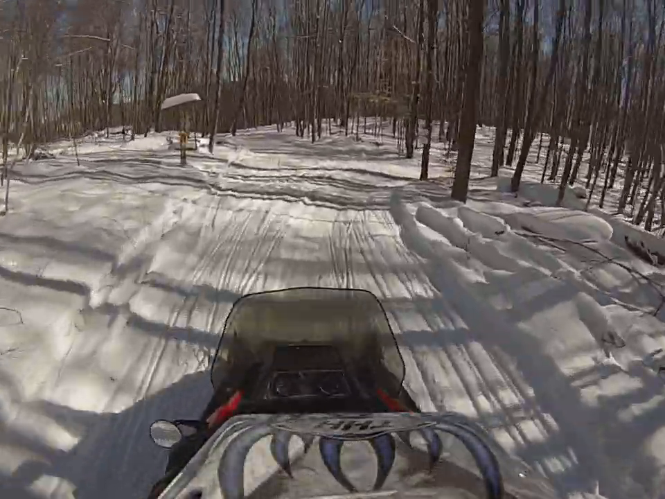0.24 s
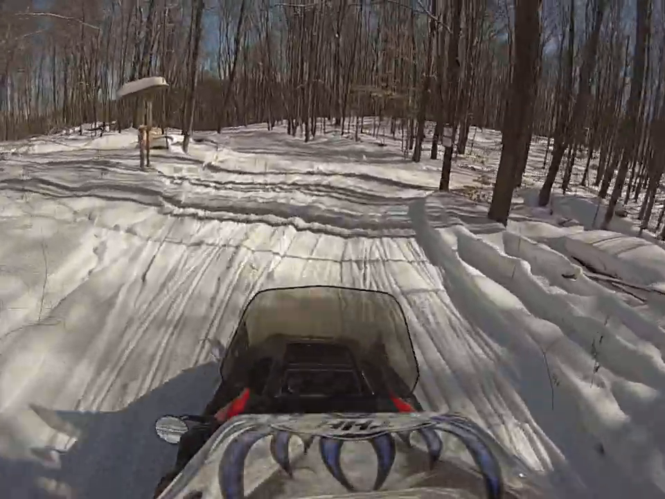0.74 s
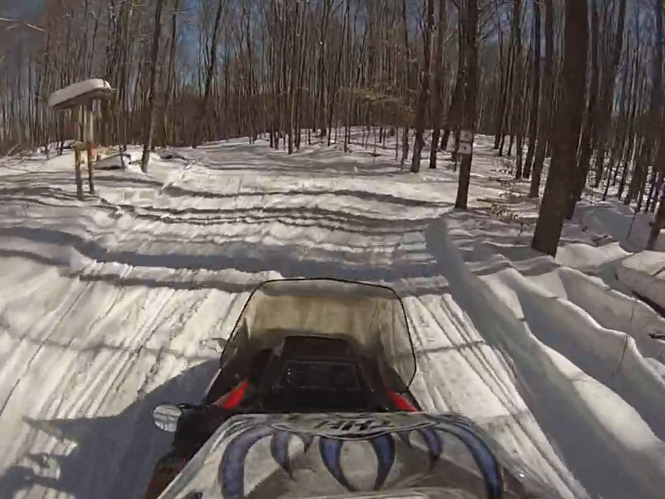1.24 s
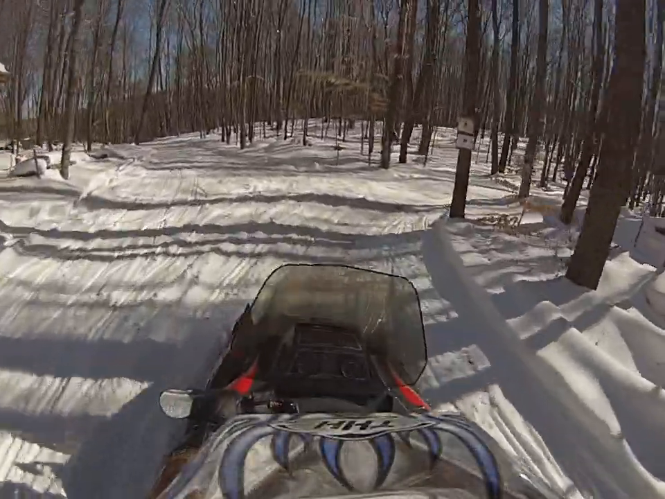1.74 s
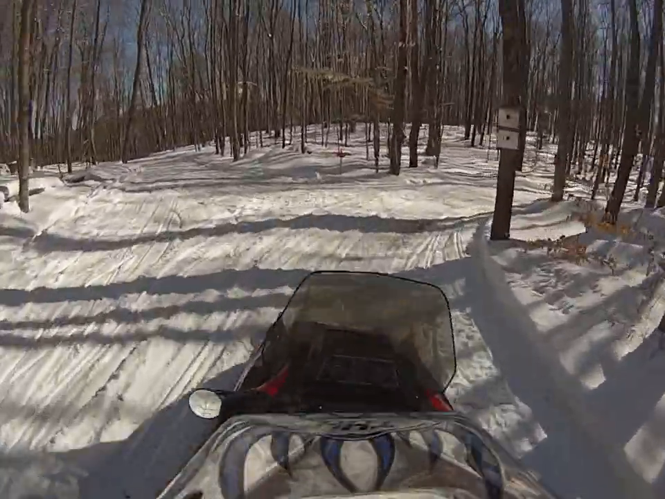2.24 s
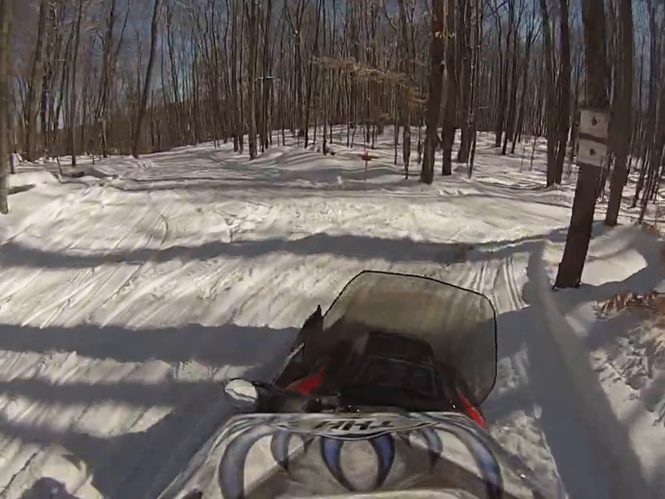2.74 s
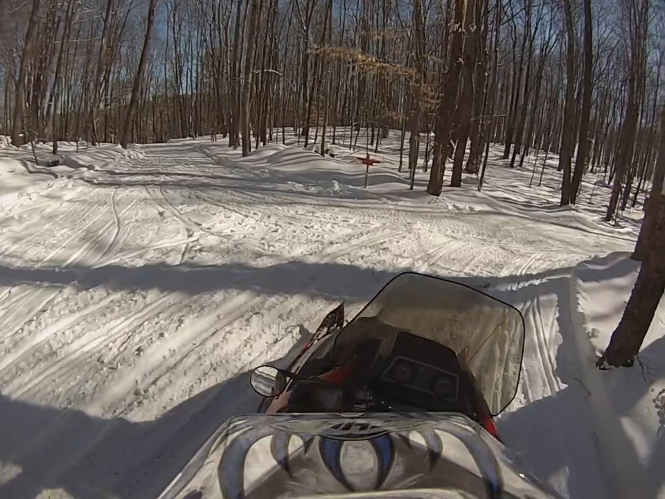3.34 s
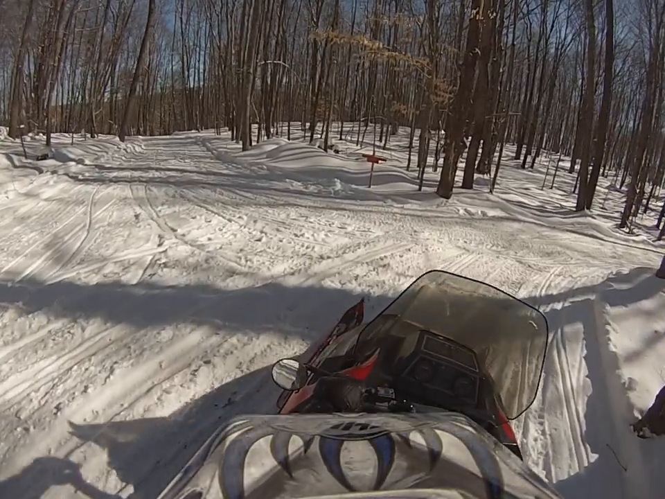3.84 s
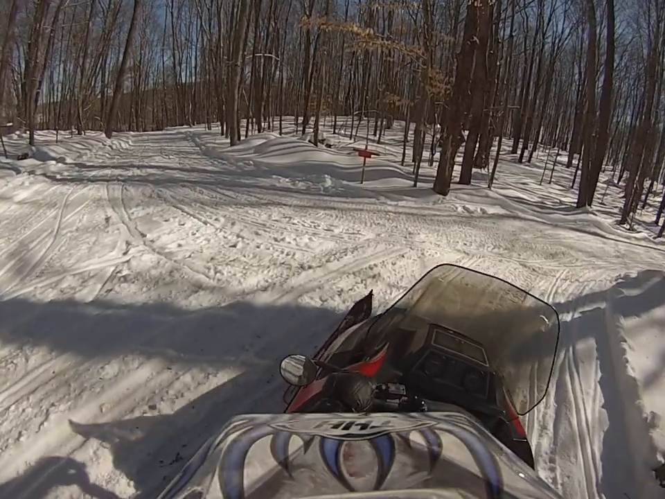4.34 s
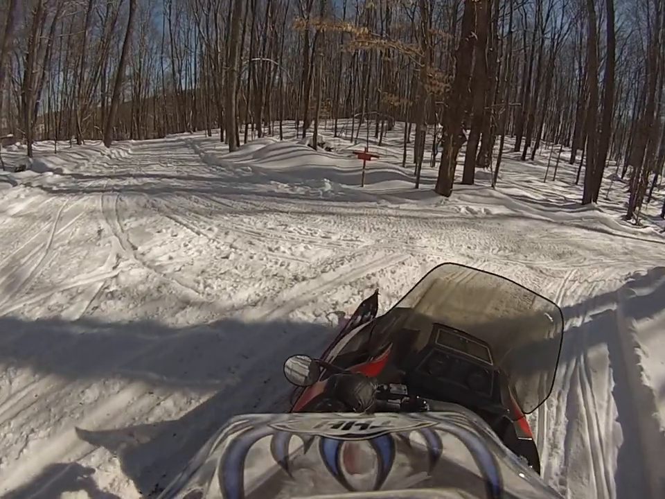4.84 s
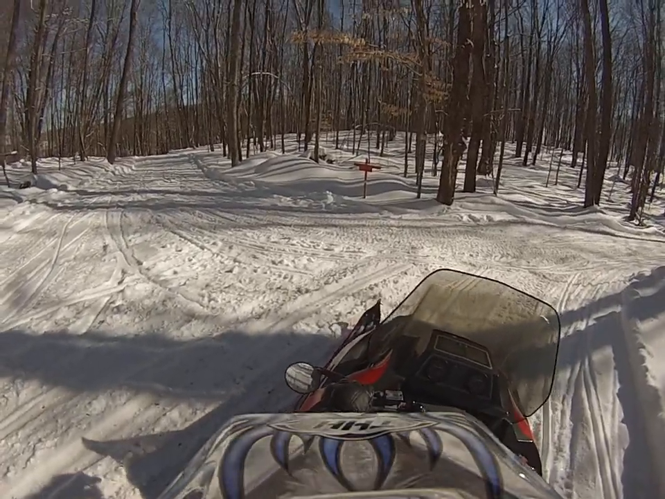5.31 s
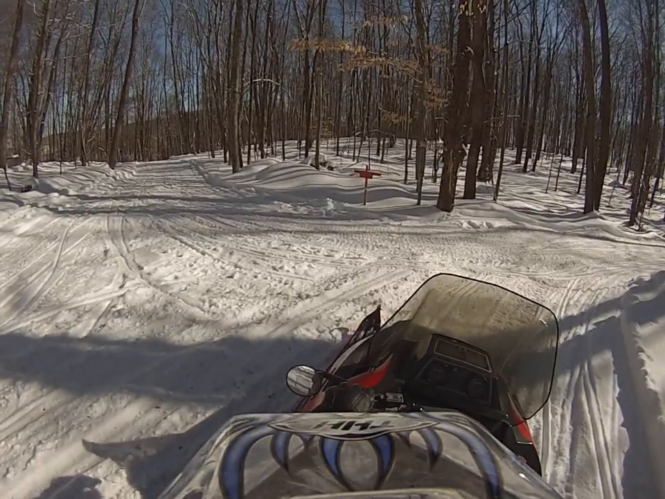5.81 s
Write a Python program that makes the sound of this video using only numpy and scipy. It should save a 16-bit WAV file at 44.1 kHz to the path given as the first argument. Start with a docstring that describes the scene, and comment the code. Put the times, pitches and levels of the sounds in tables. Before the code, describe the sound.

Close, dry onboard sound of a twin-cylinder snowmobile slowing on a snowy trail. Fast engine clatter and low rumble ease downward with the sinking hum of the track; a brief stronger drone comes as the track drags the engine. Slack belt knocks follow, then stop. The motor idles slower and slower, popping unevenly, each muffled chug shaking loose panels under a faint high mechanical hiss.

```python
"""A snowy trail, heard from the rider's helmet: a two-stroke twin snowmobile coasts to a stop.
The exhaust sums crank harmonics on the overrun and ringing bursts for the chugs, loping at idle.
Random blows and engine strokes ring the resonances of casing, clutch and panels.
The track hum is a sine that falls as the sled slows; filtered noise gives rumble, filtered blows
give snow crunch and hiss. Snow swallows all outdoor echo."""
import sys
import numpy as np
from scipy import signal
from scipy.fft import rfft, irfft
from scipy.io import wavfile

SR = 44100
rng = np.random.default_rng(int(sys.argv[2]) if len(sys.argv) > 2 else 0)


def pcm_store(signal):
    """Save signal as 16-bit PCM."""
    levels = np.round(np.clip(np.atleast_2d(signal), -1, 1) * 32767)
    wavfile.write(sys.argv[1], SR, levels.astype(np.int16).T)


N = 267687
T, HZ = np.arange(N) / SR, np.fft.rfftfreq(N, 1 / SR)

# Engine speed, two firings per crank turn. Each row: time in seconds, firing rate in Hz.
FIRING_HZ = [(0, 115), (.5, 113.3), (1.3, 101), (1.9, 98.6), (2.3, 90), (2.6, 89), (3.3, 80), (4.8, 64.3),
             (6.07, 59)]
# Overrun note: the track drives the engine. Each row: time in seconds, level in dB.
NOTE_DB = [(0, -49.5), (1.38, -48), (1.5, -37), (1.85, -33), (2.35, -42), (3.03, -45.5), (3.15, -52),
           (6.07, -61.5)]
# Second harmonic sinking into the muffler resonance. Each row: time in seconds, dB re fundamental.
SECOND_HARMONIC_DB = [(2.8, -29), (4, -8), (5, 1.5), (6, 10)]
# Bouts of hard firing. Each row: middle in seconds, exhaust level in dB before trim,
# length in seconds, panel shake in dB before trim.
CHUGS = [(.045, -36, 0.015, -50), (0.192, -36, 0.012, -58), (0.27, -37.5, .022, -46),
         (0.342, -41, .025, -60), (0.423, -42, 0.024, -54), (.52, -39, .015, -62),
         (0.599, -32.5, 0.038, -56), (0.713, -32, 0.028, -62), (.81, -33, .033, -66),
         (0.87, -36, .028, -60), (.926, -35, .025, -52), (0.99, -32, 0.032, -60), (1.105, -29, 0.03, -57),
         (1.179, -33.5, 0.026, -51), (1.251, -33, 0.064, -62), (1.327, -32, 0.04, -52),
         (1.413, -31, 0.057, -51), (1.86, -44, 0.028, -48), (1.97, -35, .025, -44),
         (3.129, -35, 0.015, -66), (3.192, -36, 0.026, -50), (3.267, -38, 0.025, -62),
         (3.375, -38, 0.036, -49), (3.437, -39, 0.036, -46.5), (3.504, -36, 0.058, -51),
         (3.657, -38, 0.097, -53), (3.758, -39, 0.041, -48), (3.871, -36, .05, -49),
         (3.999, -33.5, 0.034, -45.5), (4.109, -34.5, 0.048, -49.5), (4.21, -34, .036, -47),
         (4.323, -32.5, 0.035, -48.5), (4.46, -33, 0.038, -47), (4.583, -34.5, 0.044, -46),
         (4.723, -32.5, 0.065, -46), (4.801, -32.5, 0.047, -62), (4.867, -32.5, .021, -53),
         (4.968, -42, 0.013, -62), (5.101, -35.5, .028, -54.5), (5.208, -36, 0.028, -64),
         (5.32, -36, 0.067, -56), (5.42, -34, 0.034, -53), (5.475, -34, 0.036, -52),
         (5.556, -34.5, 0.038, -53), (5.637, -33.5, 0.028, -58), (5.732, -35, 0.024, -68),
         (5.786, -35.5, 0.032, -62), (5.837, -37, .035, -68), (5.915, -35, 0.068, -64),
         (6.023, -35, .032, -54)]
# Muffler ring, sinking with engine speed and lifting at idle. Each row: time in seconds, ring in Hz.
MUFFLER_HZ = [(.3, 104), (1.4, 103), (4.35, 95.4), (5.3, 97.56), (5.8, 102.5)]
# Track lugs over the drive wheel. Each row: time in seconds, lug rate in Hz, level in dB.
TRACK_LUGS = [(0, 300, -52), (.72, 274, -55), (1.38, 228, -69), (1.85, 196, -54.5), (2.3, 170, -61.5),
              (2.9, 128, -54), (3.4, 90, -54), (6.07, 30, -100)]
# Rocking with the crank. Each row: time in seconds, level in dB.
ROCKING_DB = [(3, -65), (4.75, -57), (5.2, -63)]

# Resonances. Each row: centre in Hz, width in Hz, relative level in dB.
CASING_MODES = [(1002, 67, -22), (1354, 39, -16), (1519, 69, -16), (1628, 74, -15), (1807, 56, -13),
                (1875, 41, -11), (1981, 105, -3.5), (2163, 77, -4.5), (2348, 126, 0.5), (2459, 131, 0),
                (2555, 65, -4), (2695, 31, -5.5), (2993, 110, -15), (3196, 97, -11.5), (3490, 130, -7),
                (3690, 150, -13), (3814, 120, -13), (3950, 120, -25), (4255, 140, -12), (4415, 290, -13.5),
                (4930, 440, -21), (5430, 230, -20), (5833, 97, -19.5), (7300, 150, -29.5)]
CLUTCH_MODES = [(2410, 500, 4), (3480, 250, 5.5), (4350, 235, 1.5), (4926, 230, 0.5), (6000, 250, -13),
                (6446, 310, 0), (6960, 290, -8.5), (7290, 320, -8.5)]
SHEAVE_MODES = [(1940, 126, 3.5), (2420, 320, -9), (3515, 180, 3.5), (4150, 420, 2.5), (4900, 230, -1.5),
                (6395, 200, -3.5)]
BLOCK_MODES = [(1513, 87, 0)]

# Broad colours, scaled later. Each row: frequency in Hz, relative density in dB per Hz.
CASING_WASH = [(100, -66), (500, -32), (1200, -24.5), (1750, -21), (2900, -26.5), (4000, -21.5),
               (5700, -26), (6900, -33), (8000, -40), (9300, -36), (10000, -45.5), (11400, -45.5),
               (15200, -52)]
CLUTCH_WASH = [(100, -57), (1000, -15.5), (3000, -2), (5000, -28), (7400, -41), (7800, -17), (9200, -28),
               (10000, -31), (13000, -30.5), (15200, -39)]
KNOCK_WASH = [(100, -45), (1000, -21), (3000, -14), (5000, -20), (7400, -26), (15200, -42)]
BLOCK_WASH = [(100, -34), (900, -19.5), (2000, -6.5), (8000, -47)]
PANEL_BUZZ_WASH = [(200, -36), (1200, -17), (1550, 4), (1750, -8), (2400, 12.5), (2850, -7.5), (3450, 8),
                   (4000, -2), (4350, 2), (5600, -8), (8000, -16), (13000, -25.5), (15200, -26)]
TICK_WASH = [(1000, -30), (2000, -14), (4500, 7), (6800, -8.5), (7400, -4), (8100, -15), (9000, -6),
             (9550, -7), (10000, -17), (15000, -32)]
CHASSIS_WASH = [(3, -9), (11, 15), (22, 9), (36, 7), (50, -1.5), (90, 17), (135, 10), (190, -1.5),
                (380, -1), (600, -5.5), (1000, -3.5), (2000, -19), (8000, -61)]
CRUNCH_WASH = [(80, -32), (220, 3), (400, 0.5), (700, -9.5), (2000, -30.5)]
HISS_WASH = [(3000, -4), (7000, -0.5), (8000, -2), (9300, 1.5), (9900, -2), (10500, 3), (11400, -7),
             (12200, 3), (13000, -2), (13800, -1), (15200, -6)]

IDLE_FROM_S, IDLE_FULL_S = 3.4, 4.0  # engine settles into its lope
CRUISE_HZ = 100  # firing rate at the reference levels
UPPER_MODE_RATIO, UPPER_MODE_DB = 1.6, -18.5  # second muffler mode, woken at idle
PUFF_HZ, PUFFS_PER_S, PUFF_DB, PUFF_S = 88, 7, -43.5, 0.017  # weak firings between bouts
CLUNK_LEAD_S, CLUNK_S, CLUNK_DB = 0.015, 0.019, -19.5  # dB re chug table level
CASING_DB, CASING_DB_PER_OCTAVE = -38, 9  # level at cruise, growth with speed
RELEASE_FROM_S, RELEASE_END_S = 2.2, 3.2  # clutch lets go of the belt
GRIPPING_DB, FREE_DB, FREE_DB_PER_OCTAVE = -46.5, -54, 5.5  # jingle with and without belt
DRAG_S, DRAG_LENGTH_S, DRAG_DB = 1.57, 0.6, 1.5  # extra jingle while the track drags the engine
KNOCK_DB, KNOCK_PEAK_S, KNOCK_RISE_S, KNOCK_STOP_S = -47, 2.54, 0.53, 0.07  # belt slack
KNOCK_REST_DB, KNOCK_DB_PER_OCTAVE = -61.5, 3
SHAKE_LEAD_S, SHAKE_S = 0.0097, 0.027  # panels shake just before the exhaust answers
TICK_S, TICK_LENGTH_S, TICK_DB = 5.34, 0.68, -60.5  # tick comes forward as the idle steadies
TICK_REST_DB, TICK_IDLE_RISE_DB = -66.5, 4.5
WHINE_S, WHINE_LENGTH_S, WHINE_DB = 2.97, 0.32, -62  # shaft sings as the load comes off
RUMBLE_DB, RUMBLE_DB_PER_OCTAVE = -49, 6.5  # level at cruise, growth with speed
CRUNCH_DB, STOP_FROM_S, CRUNCH_FADE_DB_PER_S = -57, 1.53, 13
EDGE_HZ = 15250


def amp(db):
    """Decibels to gain."""
    return 10 ** (np.asarray(db) / 20)


def unit(x):
    """Scales to rms one."""
    return x / np.sqrt(np.mean(x ** 2) + 1e-20)


def curve(rows):
    """Table columns joined by straight lines in time."""
    s, *columns = np.transpose(rows)
    return [np.interp(T, s, c) for c in columns]


def ramp(from_s, to_s):
    """Goes from 0 to 1 between two moments."""
    return np.clip((T - from_s) / (to_s - from_s), 0, 1)


def swell(middle_s, length_s):
    """Smooth bump, about length_s wide."""
    return np.exp(-2 * np.minimum(((T - middle_s) / length_s) ** 2, 20))


def wander(hz):
    """Random drift of rms one, up to about the given rate."""
    return unit(irfft(rfft(rng.standard_normal(N)) * np.exp(-(HZ / hz) ** 2), N))


def impacts(per_s, spread_db):
    """Random hail of blows of uneven size."""
    size = amp(spread_db * np.minimum(rng.exponential(1, N), 2))
    signed = size * rng.choice([-1, 1], N)
    return unit(signed * (rng.random(N) < per_s / SR))


def strokes(cycles, decay_cycles, uneven_db):
    """One decaying noise burst per cycle, of uneven strength."""
    size = amp(uneven_db * rng.uniform(-1, 1, 2000))
    envelope = np.exp(-(cycles % 1) / decay_cycles)
    return unit(size[cycles.astype(int)] * envelope * rng.standard_normal(N))


def body(x, wash, modes=()):
    """Minimum-phase ringing: resonances on top of a broad colour, output at rms one."""
    wash_hz, wash_db = np.transpose(wash)
    power = amp(np.interp(np.log(HZ + 1), np.log(wash_hz), wash_db)) ** 2
    for hz, width_hz, db in modes:
        power = power + amp(db) ** 2 / (1 + ((HZ - hz) / width_hz) ** 2) ** 3
    # folding the cepstrum makes the response causal
    cepstrum = irfft(np.log(power) / 2, N)
    cepstrum[1:N // 2] *= 2
    cepstrum[N // 2:] = 0
    return unit(irfft(rfft(x) * np.exp(rfft(cepstrum)), N))


def exhaust(firings):
    """Crank harmonics while the track drives the engine; muffler rings in bursts when it fires by fits."""
    level_db, = curve(NOTE_DB)
    ring_hz, = curve(MUFFLER_HZ)
    second_db, = curve(SECOND_HARMONIC_DB)
    angle = 2 * np.pi * firings
    note = np.sin(angle) + amp(second_db) * np.sin(2 * angle)
    note += amp(-28) * np.sin(3 * angle) + amp(-37) * np.sin(4 * angle)
    out = amp(level_db + 0.45 * wander(22)) * np.sqrt(2) * note
    upper = amp(UPPER_MODE_DB) * ramp(IDLE_FROM_S, IDLE_FULL_S)
    for s, db, length_s, _ in CHUGS:
        at = abs(T - s) < 2 * length_s
        # ring is in step with the firing at the middle of the burst
        ring = 2 * np.pi * (ring_hz[at] * (T[at] - s) + np.interp(s, T, firings))
        modes = np.cos(ring) + upper[at] * np.cos(UPPER_MODE_RATIO * ring)
        out[at] += amp(db - 2.2) * swell(s, length_s)[at] * modes
    return out


def puffs():
    """Weak stray firings ring the muffler at random moments at idle."""
    t = T[:4000] - T[2000]
    puff = np.exp(-2 * (t / PUFF_S) ** 2) * np.cos(2 * np.pi * PUFF_HZ * t)
    fired = (rng.random(N) < PUFFS_PER_S / SR) * ramp(IDLE_FROM_S, IDLE_FULL_S)
    return amp(PUFF_DB) * signal.oaconvolve(fired, puff, "same")


def block():
    """Each hard firing at idle clunks the cylinder block: a noise burst through its resonance."""
    clunks = sum(amp(db + CLUNK_DB) * swell(s - CLUNK_LEAD_S, CLUNK_S) for s, db, _, _ in CHUGS)
    force = ramp(IDLE_FROM_S, IDLE_FULL_S) * clunks
    return force * body(rng.standard_normal(N), BLOCK_WASH, BLOCK_MODES)


def hood(x, ring_s, share):
    """Engine bay adds a short dense ring, a fine metallic grain."""
    t = T[:4000]
    tail = rng.standard_normal(len(t)) * np.exp(-t / ring_s) * (t > 0.004)
    return unit(x + share * signal.oaconvolve(x, tail / np.linalg.norm(tail))[:N])


def casing(firings, octaves):
    """Piston slap and bearing and roller blows ring the crankcase, louder with speed."""
    bearings = impacts(per_s=7000, spread_db=2)
    slap = strokes(firings, decay_cycles=0.3, uneven_db=3)
    rattle = body(bearings + 0.45 * slap, CASING_WASH, CASING_MODES)
    level_db = CASING_DB + CASING_DB_PER_OCTAVE * octaves
    return amp(level_db + 0.84 * wander(18)) * hood(rattle, ring_s=0.01, share=0.31)


def clutch(firings, octaves):
    """Spinning clutch jingles, and its sheaves knock once a turn, loudest while the belt is slack."""
    hail = impacts(per_s=4000, spread_db=-1)
    beats = strokes(firings, decay_cycles=0.7, uneven_db=8.5)
    jingle = body(hail + 0.5 * beats, CLUTCH_WASH, CLUTCH_MODES)
    free = ramp(RELEASE_FROM_S, RELEASE_END_S)
    gripping_db = GRIPPING_DB + DRAG_DB * swell(DRAG_S, DRAG_LENGTH_S)
    free_db = FREE_DB + FREE_DB_PER_OCTAVE * octaves
    jingle_db = (1 - free) * gripping_db + free * free_db

    turns = firings / 2
    knocks = body(strokes(turns, decay_cycles=0.3, uneven_db=2), KNOCK_WASH, SHEAVE_MODES)
    rise = np.maximum(KNOCK_PEAK_S - T, 0) / KNOCK_RISE_S
    stop = np.maximum(T - RELEASE_END_S, 0) / KNOCK_STOP_S
    slack = np.exp(-rise - stop)
    knocking = np.hypot(amp(KNOCK_DB) * slack, amp(KNOCK_REST_DB + KNOCK_DB_PER_OCTAVE * octaves))
    return amp(jingle_db + 1.2 * wander(22)) * hood(jingle, ring_s=0.018, share=0.35) + knocking * knocks


def panels(firings):
    """Loose panels buzz when a chug shakes the engine."""
    shake = sum(amp(db) * swell(s - SHAKE_LEAD_S, SHAKE_S) for s, _, _, db in CHUGS)
    hail = impacts(per_s=3000, spread_db=2.5)
    beats = strokes(firings, decay_cycles=0.25, uneven_db=-1)
    return amp(4.5) * shake * body(hail + 0.42 * beats, PANEL_BUZZ_WASH)


def ticking(firings):
    """Light tick: noise pulsed once a turn, stronger at idle."""
    pulse = (0.5 + 0.5 * np.cos(np.pi * firings)) ** 3
    tick = body(pulse * rng.standard_normal(N), TICK_WASH)
    rest_db = TICK_REST_DB + TICK_IDLE_RISE_DB * ramp(IDLE_FROM_S, IDLE_FULL_S)
    level = np.hypot(amp(TICK_DB) * swell(TICK_S, TICK_LENGTH_S), amp(rest_db))
    return level * amp(1.5 * wander(21)) * tick


def track_lugs():
    """Lugs over the drive wheel hum at a falling, slightly unsteady rate."""
    lug_hz, lug_db = curve(TRACK_LUGS)
    lugs = np.cumsum(lug_hz * (1 + 0.0094 * wander(24.7))) / SR
    return amp(lug_db + 3.4 * wander(19)) * unit(np.sin(2 * np.pi * lugs))


def shaft_whine(firings):
    """Shaft sings faintly at 12 times the firing rate."""
    singing = 1 / (1 + ((T - WHINE_S) / WHINE_LENGTH_S) ** 4)
    tone = unit(np.sin(np.pi * 24 * firings + 0.4 * wander(40)))
    return amp(WHINE_DB + wander(30)) * singing * tone


def chassis(firings, octaves):
    """Chassis rumbles as filtered noise, louder with speed, and rocks as a sine once a turn."""
    rumble_db = RUMBLE_DB + RUMBLE_DB_PER_OCTAVE * octaves + 0.91 * wander(9)
    rumble = amp(rumble_db) * body(rng.standard_normal(N), CHASSIS_WASH)
    rocking_db, = curve(ROCKING_DB)
    return rumble + amp(rocking_db) * unit(np.sin(np.pi * firings))


def snow_crunch():
    """Packed snow crunches dully under the track, dying away as the sled stops."""
    crunch = body(impacts(per_s=900, spread_db=6.5), CRUNCH_WASH)
    level_db = CRUNCH_DB - CRUNCH_FADE_DB_PER_S * np.maximum(T - STOP_FROM_S, 0)
    return amp(level_db) * crunch


def mechanical_hiss():
    """Dense small blows make a fine high spray."""
    return amp(-68 + 1.2 * wander(25)) * body(impacts(per_s=5500, spread_db=4), HISS_WASH)


def scene():
    """One crankshaft phase drives the engine parts; track, snow and hiss run beside it."""
    firing_hz, = curve(FIRING_HZ)
    firings = np.cumsum(firing_hz * (1 + 0.003 * wander(15))) / SR
    octaves = np.log2(firing_hz / CRUISE_HZ)
    engine = exhaust(firings) + puffs() + block() + casing(firings, octaves) + clutch(firings, octaves)
    loose_parts = panels(firings) + ticking(firings)
    running_gear = track_lugs() + shaft_whine(firings) + chassis(firings, octaves) + snow_crunch()
    return (engine + loose_parts + running_gear + mechanical_hiss())[None]


def record(dry):
    """Steep linear-phase low-pass at EDGE_HZ."""
    lowpass = signal.firwin(801, EDGE_HZ, window=("kaiser", 9), fs=SR)
    return signal.oaconvolve(dry, lowpass[None], "same")


dry = scene()
out = record(dry)
pcm_store(out)
```